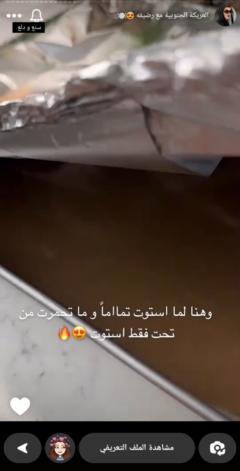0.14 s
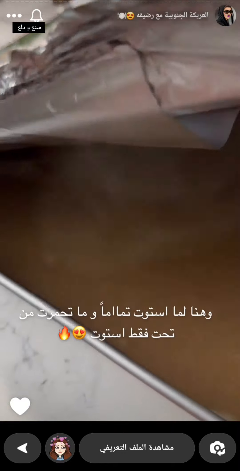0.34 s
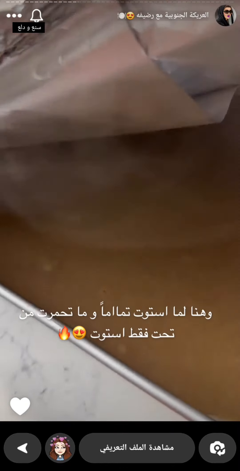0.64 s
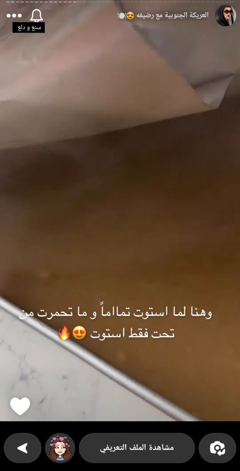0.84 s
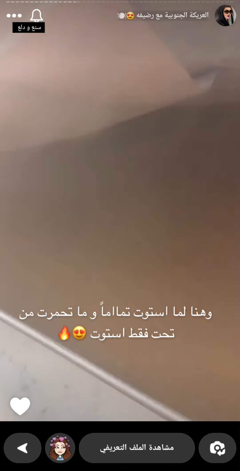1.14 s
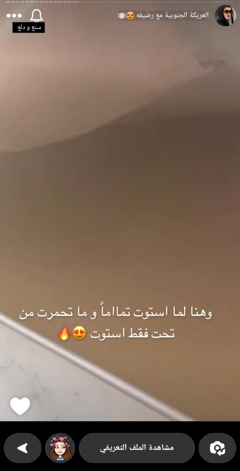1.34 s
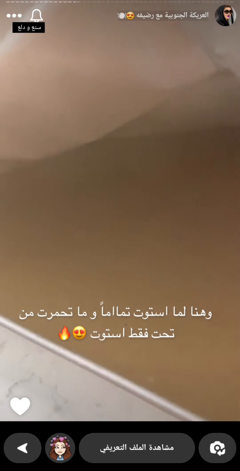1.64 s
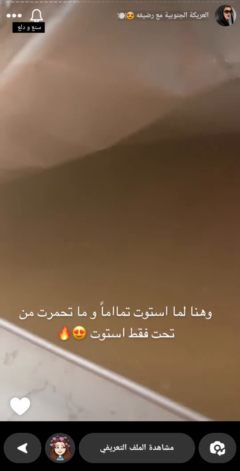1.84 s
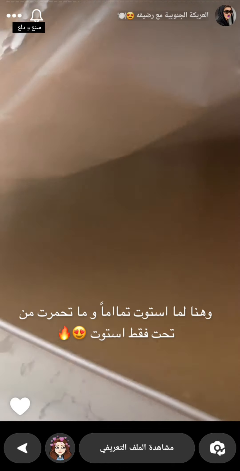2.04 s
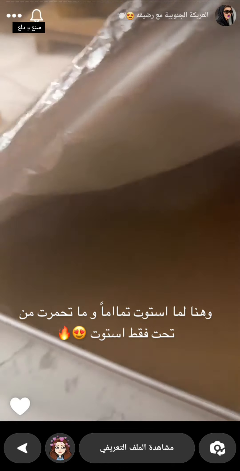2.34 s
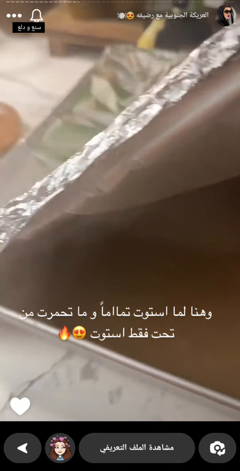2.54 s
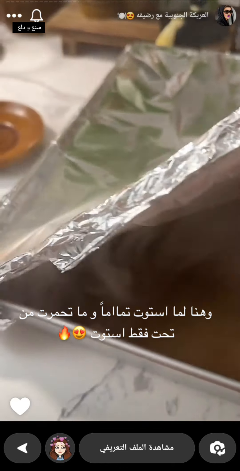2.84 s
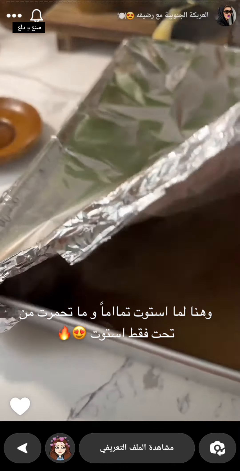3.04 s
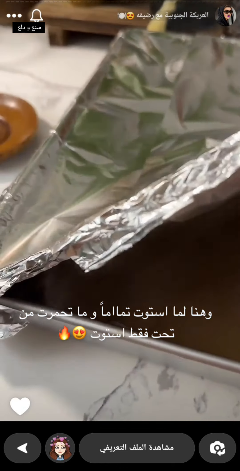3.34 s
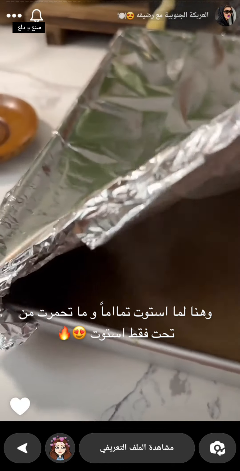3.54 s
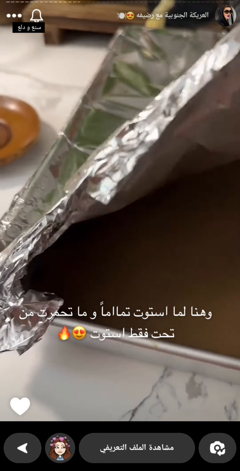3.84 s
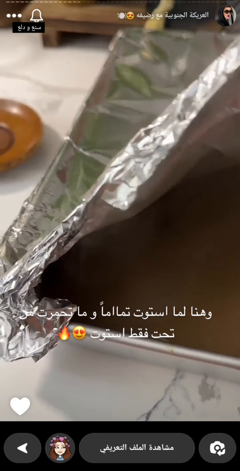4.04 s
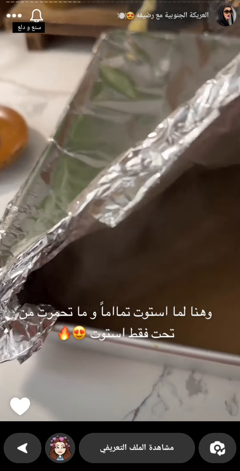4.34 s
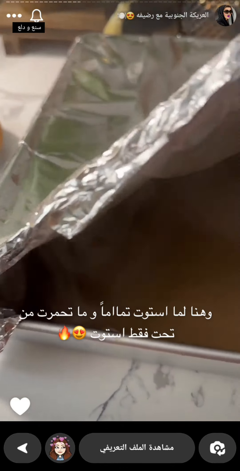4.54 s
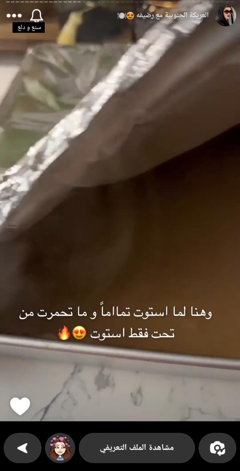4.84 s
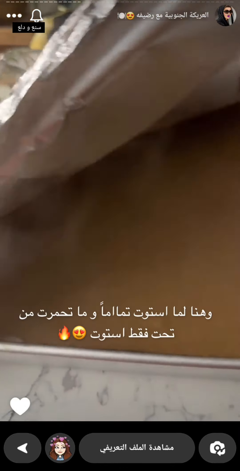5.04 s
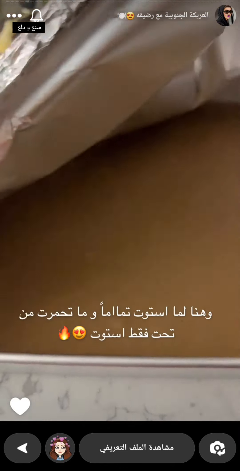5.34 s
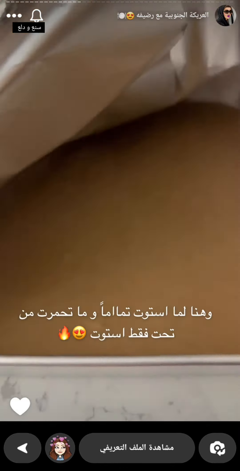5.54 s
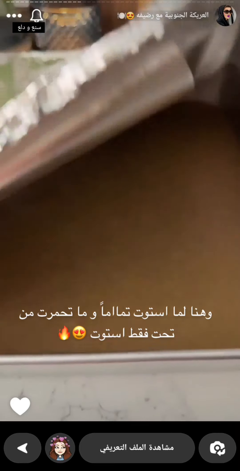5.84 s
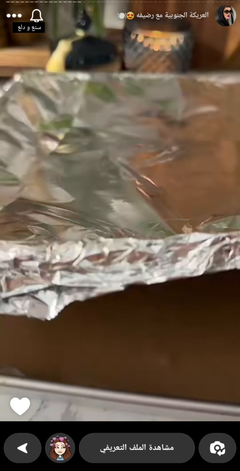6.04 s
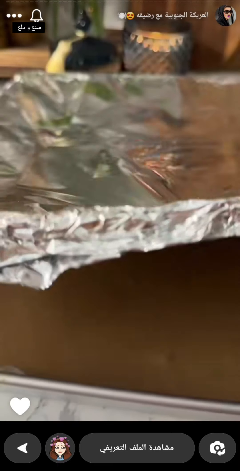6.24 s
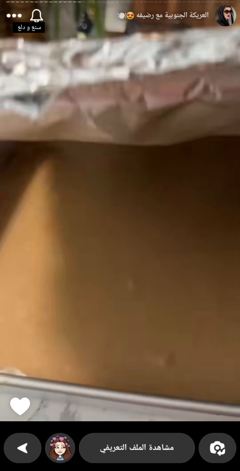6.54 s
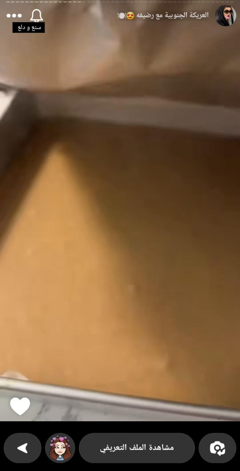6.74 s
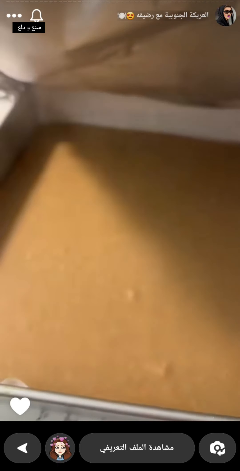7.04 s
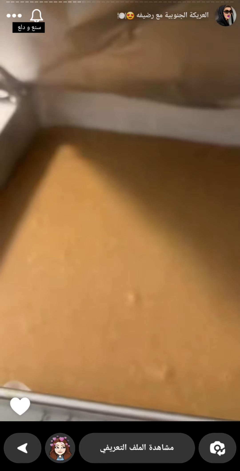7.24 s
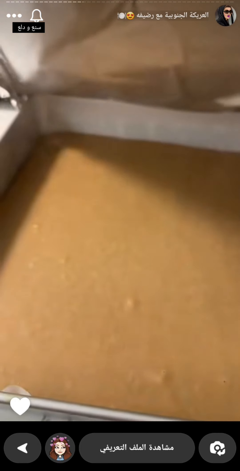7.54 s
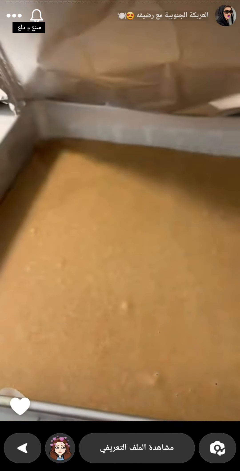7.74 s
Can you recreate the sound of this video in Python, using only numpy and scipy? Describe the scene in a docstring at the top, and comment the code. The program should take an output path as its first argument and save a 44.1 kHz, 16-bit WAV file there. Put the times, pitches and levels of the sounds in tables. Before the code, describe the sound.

Close to a phone microphone in a small kitchen, aluminium foil is peeled off a baking tray over a constant low appliance hum, slightly wavering, with soft low air noise. From 0 to 1.7 s the foil buckles in dense, hard crackles, strongest around 0.8 and 1.6 s, with bright snaps, fine crinkles and rustle; a faint low thump falls near 1.5 s. From 1.7 to 2.5 s it thins to light ticks, then a sharp snap at 2.7 s. Crinkling rebuilds from 3 to 4.3 s and peaks between 4.7 and 5.4 s, loud and dense, with another soft thump near 5.1 s. A crisp snap follows at 5.5 s, then smaller crackles. At 6.1 s all sound, hum included, vanishes for 0.2 s, returns muffled, and brightens at about 6.7 s. Only scattered snaps and very faint crinkles remain until nearly 8 s.

```python
"""In a kitchen, close to a phone microphone, aluminium foil is peeled back from a baking tray over a steady hum.
The foil buckles in bursts of shaped noise, lone creases snap with a ringing crack, and fine crinkles and a
rustle follow each pull. The bending sheet adds a low flutter and two soft thumps, and the room answers briefly.
The hum is a set of unsteady tones over low-passed air noise. Near the end all sound cuts out for a moment
and comes back dull, then bright; from there on the foil makes only sparse snaps and faint crinkles."""
import sys
import numpy as np
from scipy import signal
from scipy.fft import rfft, irfft, next_fast_len
from scipy.io import wavfile
from scipy.ndimage import map_coordinates

SR = 44100
rng = np.random.default_rng(int(sys.argv[2]) if len(sys.argv) > 2 else 0)


def int16_out(signal):
    """Quantize to a 16-bit WAV file."""
    q = np.round(np.clip(np.atleast_2d(signal).T, -1, 1) * 32767)
    wavfile.write(sys.argv[1], SR, q.astype(np.int16))


N = 347508  # length in samples


def amp(db):
    """Gain for a level in dB."""
    return 10 ** (np.asarray(db) / 20)


def unit(x):
    """x scaled to an rms of one."""
    return x / np.sqrt(np.mean(x ** 2) + 1e-20)


def along(points, hz):
    """Read a curve of (hz, value) points on a log frequency axis."""
    f, v = np.transpose(points)
    return np.interp(np.log(hz + 1), np.log(f + 1), v)


def wobble(rate):
    """A smooth random curve of unit rms, with rate knots a second."""
    knots = rng.standard_normal(int(N * rate / SR) + 4)
    return unit(map_coordinates(knots, [np.arange(N) * rate / SR]))


def filtered(x, gain):
    """x through a causal minimum-phase filter with the given gain over frequency."""
    m = 2 * next_fast_len(x.shape[-1] // 2 + 4096)
    cepstrum = irfft(np.log(np.maximum(gain(np.fft.rfftfreq(m, 1 / SR)), 1e-6)))
    # folding the cepstrum forward in time makes the phase minimal
    cepstrum[1:m // 2] *= 2
    cepstrum[m // 2 + 1:] = 0
    response = np.exp(rfft(cepstrum))
    return irfft(rfft(x, m) * response, m)[..., :x.shape[-1]]


def add(track, s, sound):
    """Mix a sound into the track at time s, in seconds."""
    start = int(np.clip(round(s * SR), 0, N - 1))
    track[start:start + len(sound)] += sound[:N - start]


def facet(pitch_hz, q):
    """Resonant gain of one flat facet of foil, ringing between its creases."""
    return lambda hz: 1 / np.hypot(1, q * (hz / pitch_hz - pitch_hz / (hz + 1)))


def uneven(depth_db, size=26):
    """A random colour: every fold radiates a little differently."""
    points = np.column_stack([np.geomspace(400, 16000, size), depth_db * rng.standard_normal(size)])
    return lambda hz: amp(along(points, hz))


def swarm(t, spiky_db):
    """A dense swarm of tiny cracks: noise whose level wavers by spiky_db from millisecond to millisecond."""
    knots = np.arange(0, t[-1], .001)
    waver = np.interp(t, knots, rng.standard_normal(len(knots)))
    return unit(rng.standard_normal(len(t)) * amp(abs(spiky_db) * waver))


def buckles():
    """Patches buckle: first cracks gather, the avalanche breaks within milliseconds and dies away."""
    # Buckling patches: start_s, level_db (relative), t60_s
    buckle_events = [(0.0422, -0.5, 0.048), (0.1233, -5, .098), (0.3663, -7.5, 0.029),
                     (0.4831, -4.5, 0.057), (0.4995, -5.5, 0.088), (0.606, -12.5, 0.065),
                     (0.7318, -9.5, 0.057), (0.764, 3.5, 0.047), (0.8942, 2, 0.076), (0.9467, -7.5, 0.056),
                     (1.094, -8, 0.082), (1.1654, -6, 0.064), (1.2467, -6.5, 0.083), (1.376, -8, 0.059),
                     (1.4426, -3.5, 0.077), (1.4716, -3.5, 0.11), (1.5412, 0, 0.044), (1.5693, -5, 0.16),
                     (1.6141, 1.5, .065), (2.597, -9.5, 0.076), (2.968, -10.5, 0.12), (3.1804, -9.5, 0.24),
                     (3.3066, -6.5, .14), (3.7038, -8, 0.049), (3.8086, -3, 0.047), (3.9067, -3.5, 0.15),
                     (3.9645, -1, 0.095), (4.053, -11, 0.061), (4.1555, -10, 0.047), (4.2232, -6, 0.052),
                     (4.6841, -2.5, 0.078), (4.846, -1.5, 0.42), (4.9482, 2.5, .12), (5.014, -2.5, 0.31),
                     (5.06, 4.5, 0.11), (5.1641, 2, 0.067), (5.2251, -3.5, 0.065), (5.3126, -5, .07),
                     (5.3762, -3, 0.071), (5.8458, -3, 0.095), (5.9770, -10, 0.041), (6.032, -5, 0.21),
                     (6.0795, -5.5, 0.052)]
    # body against treble at level 0, its change per dB (harder buckles are brighter), and its chance
    body_at_zero_db, body_per_db, body_scatter_db = -10.5, -0.24, 0.5
    lead_s = .03
    out, t = np.zeros(N), np.arange(SR // 4) / SR - lead_s
    before, after = np.minimum(t, 0), np.maximum(t, 0)
    for s, db, t60 in buckle_events:
        body_db = body_at_zero_db + body_per_db * db + body_scatter_db * rng.standard_normal()
        floored_t60 = max(t60, .01)
        gathering = amp(-17) * np.exp(before / (.1 * floored_t60))
        breaking = 1 - np.exp(-after / (.045 * floored_t60))  # short avalanches break fastest
        shape = (gathering + breaking) * amp(-60 * after / floored_t60)
        colour = uneven(depth_db=2.5, size=44)
        cracks = swarm(t, spiky_db=-0.5) * shape
        burst = filtered(cracks, lambda hz: colour(hz) * amp(body_db / (1 + (hz / 3500) ** 2)))
        add(out, s - lead_s, amp(db - 10.0) * burst)  # the swarm's rms lies well under its peaks
    return out


def snaps():
    """A lone crease flips: a sharp crack rings its facet, and the sheet shivers with a longer decay."""
    # Snapping creases: start_s, peak_db, facet_pitch_hz
    snap_events = [(0.2278, -22, 6400), (0.6916, -17, 6500), (0.8292, -13.5, 6950), (1.2094, -9, 7100),
                   (1.331, -21, 7000), (1.9630, -37, 4460), (2.0636, -25.5, 4900), (2.1176, -21.5, 3370),
                   (2.2025, -23, 5230), (2.2393, -21, 2700), (2.398, -29, 2900), (2.6725, -11, 7900),
                   (3.058, -25, 6940), (3.1787, -19, 7200), (3.5280, -29.5, 5000), (3.593, -22.5, 6400),
                   (4.4427, -20.5, 2380), (4.5362, -15.5, 6750), (4.605, -19.5, 5760),
                   (4.7931, -11.5, 3580), (5.504, -10.5, 6700), (5.651, -19, 6750), (6.4006, -17, 5300),
                   (6.542, -29.5, 3050), (6.6030, -27.5, 3500), (6.6726, -17, 5770), (7.1033, -16, 4880),
                   (7.1921, -21.5, 5250), (7.2641, -21.5, 5550), (7.4115, -26, 3270), (7.6555, -23.5, 4900),
                   (7.7144, -16.5, 2540), (7.8186, -12, 5100)]
    out, t = np.zeros(N), np.arange(SR // 8) / SR
    for s, db, pitch_hz in snap_events:
        ring, colour = facet(pitch_hz, q=4), uneven(depth_db=3)
        sheet = facet(.55 * pitch_hz, q=.45)
        crack_t60 = .021 * np.sqrt(6000 / pitch_hz)  # large, low facets ring longer
        click = rng.standard_normal(len(t)) * amp(-60 * t / crack_t60)
        crack = filtered(click, lambda hz: ring(hz) + 0.064 + 0.1 * (hz / 16000) ** 2)
        shaking = rng.standard_normal(len(t)) * amp(-60 * t / 0.11)
        shiver = filtered(shaking, lambda hz: colour(hz) * sheet(hz))
        snap = unit(crack) + amp(-4) * unit(shiver)
        add(out, s + .001, amp(db) * snap / np.abs(snap).max())
    return out


def handling():
    """How strongly the sheet is moved, as a gain per sample: each pull rises, tightens and lets go."""
    # Pulls of the hand: start_s, length_s, level_db (relative crinkle level at mid-pull)
    pulls = [(0.0, 0.02, -30), (0.113, 0.026, -34.5), (0.265, .24, -35.5), (0.6, 0.24, -35.5),
             (0.882, .08, -35), (1.168, 0.16, -37.5), (1.392, .24, -35), (1.671, 0.071, -33.5),
             (2.195, 0.082, -47), (2.531, .31, -38), (3.064, 0.14, -33.5), (3.296, 0.11, -36.5),
             (3.62, 0.36, -33), (4.097, 0.27, -34), (4.543, .08, -38), (4.655, 0.065, -28.5),
             (4.852, 0.24, -26.5), (5.121, 0.11, -29), (5.345, 0.13, -29), (5.53, 0.12, -37),
             (5.777, .32, -34), (6.323, 0.38, -51.5), (6.806, 0.13, -47.5), (7.42, 0.062, -52.5),
             (7.73, 0.11, -46.5)]
    rise_db_per_s, release_db_per_s = 401, 178  # the folds take up strain quickly and settle more slowly
    tension_db = 2  # growth from the start of a pull to its end
    rest_db = -66  # the sheet while it is only held
    t, level_db = np.arange(N) / SR, np.full(N, float(rest_db))
    for s, length, db in pulls:
        tension = tension_db * (np.clip((t - s) / length, 0, 1) - .5)
        rise = rise_db_per_s * np.maximum(s - t, 0)
        release = release_db_per_s * np.maximum(t - s - length, 0)
        level_db = np.maximum(level_db, db + tension - (rise + release))
    return amp(level_db)


def crinkles(count=1700):
    """Small folds give way at jittered times, each on its own pitch, over a rustle; both swell in clusters."""
    out, t = np.zeros(N), np.arange(SR // 30) / SR
    decay = (1 - np.exp(-t / .0006)) * amp(-60 * t / .032)
    for k, (late, size, pitch) in enumerate(rng.standard_normal((count, 3))):
        pitch_hz = np.clip(5500 * np.exp(.65 * pitch), 800, 15000)
        ring = facet(pitch_hz, q=5)
        crack = unit(filtered(rng.standard_normal(len(t)) * decay, lambda hz: 0.2 + ring(hz)))
        radiation = np.sqrt(min(pitch_hz / 5500, 1))  # thin foil radiates its low notes poorly
        strength = amp(5 * min(size, 1.2))
        add(out, (k + late) / count * N / SR, strength * radiation * crack)
    clusters = amp(1.44 * wobble(45))
    movement = amp(-2.5) * handling() * clusters
    rustle = amp(-1.5) * swarm(np.arange(N) / SR, spiky_db=0.5)
    return movement * (unit(out) + rustle)


def flexing(thump_hz=68, t60=.25):
    """The whole sheet pushes air in a low flutter as it bends, and flops over with a soft decaying thump."""
    # Flops of the sheet: start_s, level_db (peak)
    flops = [(1.468, -33), (5.065, -32.5)]
    flutter = unit(filtered(rng.standard_normal(N), lambda hz: facet(110, q=.8)(hz) ** 2))
    out, t = amp(-20) * handling() * flutter, np.arange(SR // 3) / SR
    for s, db in flops:
        add(out, s, amp(db - 60 * t / t60) * np.sin(2 * np.pi * thump_hz * t))
    return out


def kitchen(x, count=20):
    """The room's short answer: noise tails, new for each stretch of sound, dying at a speed set by frequency."""
    # Reverberation of the room: frequency_hz, t60_s
    room_decay = [(200, 0.21), (2000, 0.36), (7000, 0.063), (15000, 0.05)]
    out, start = np.zeros(N), 0
    for piece in np.array_split(x, count):
        hz, t, z = signal.stft(rng.standard_normal(SR // 3), SR, nperseg=256)
        fading = z * amp(-60 * t / along(room_decay, hz)[:, None])
        tail = signal.istft(fading, SR, nperseg=256)[1]
        answer = signal.fftconvolve(piece, tail / np.linalg.norm(tail))
        add(out, start / SR + .004, answer)  # 4 ms after the direct sound
        start += len(piece)
    return out


def appliance():
    """Motor tones, slightly unsteady in level and phase, over a low rush of air."""
    # Motor tones: frequency_hz, level_db (relative rms)
    motor_tones = [(118.4, -54.5), (208.3, -45.5), (259.4, -51.5), (311.8, -52), (531, -53.5)]
    # Colour of the air noise: frequency_hz, level_db (relative)
    air_colour = [(20, -34.5), (55, 1.5), (85, 5.5), (150, 1), (250, 3.5), (400, -4), (540, -4),
                  (680, -14.5), (1200, -19), (3000, -21.5), (8000, -50), (15000, -51.5)]
    t, tones = np.arange(N) / SR, np.zeros(N)
    for hz, db in motor_tones:
        level = amp(db + 0.74 * wobble(9.0)) * np.sqrt(2)
        tones += level * np.sin(2 * np.pi * hz * t + 1.0 * wobble(7))
    air = unit(filtered(rng.standard_normal(N), lambda hz: amp(along(air_colour, hz))))
    return amp(-1.5) * tones + amp(-45.0) * air


def scene():
    """Everything sits in the middle; only the foil's treble scatters to the sides."""
    # Voice of the buckling, crinkling sheet: frequency_hz, level_db (relative)
    foil_voice = [(60, -1), (250, 0.5), (450, 2), (600, -5), (760, -1), (1200, -2.5), (2300, -2),
                  (3300, -5.5), (4700, -8), (6300, -2.5), (8500, -5), (10500, -15), (15500, -14)]
    # Foil at the sides against the middle: frequency_hz, level_db
    side_spread = [(3800, -60), (4600, -13), (7500, -21), (10500, -9), (15000, -6)]
    sheet = filtered(buckles() + crinkles(), lambda hz: amp(along(foil_voice, hz) + 7.0))
    foil = sheet + snaps()
    mid = foil + amp(-12.0) * kitchen(foil) + flexing() + appliance()
    side = filtered(foil, lambda hz: amp(along(side_spread, hz)))
    side = np.roll(side, SR // 700)  # the scattered treble arrives a little later
    return np.array([mid + side, mid - side])


def below(x, top_hz):
    """x with everything from top_hz upwards removed."""
    keep = np.fft.rfftfreq(2 * N, 1 / SR) < top_hz
    return irfft(rfft(x, 2 * N) * keep)[:, :N]


def record(dry):
    """The microphone loses deep bass and notches the top octave; sound cuts out briefly and returns dull."""
    # Microphone response: frequency_hz, gain_db
    mic_response = [(22, -10), (50, 0), (10000, 0), (11000, -4), (11700, -16), (12400, -19), (13200, -12),
                    (14200, -2), (15500, 0)]
    # The gap: cuts_out_s, returns_dull_s, bright_again_s
    gap = (6.113, 6.317, 6.665)
    dull_hz, top_hz = 6650, 15950  # upper limit just after the gap, and throughout
    sound = filtered(dry, lambda hz: amp(along(mic_response, hz)))
    t = np.arange(N) / SR
    out, back, bright = gap
    dull = below(sound * ((t > back) & (t <= bright)), dull_hz)
    return below(sound * ((t < out) | (t > bright)) + dull, top_hz)


dry = scene()
out = record(dry)
int16_out(out)
```